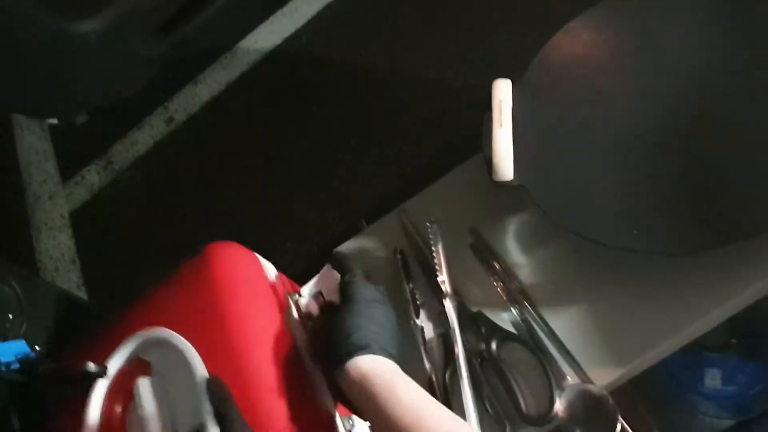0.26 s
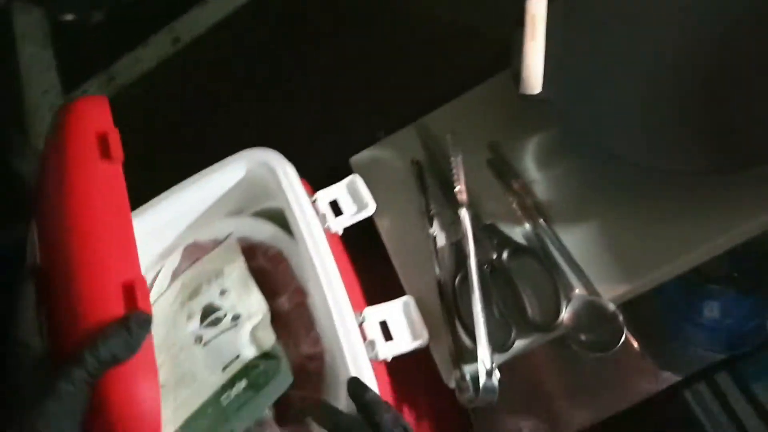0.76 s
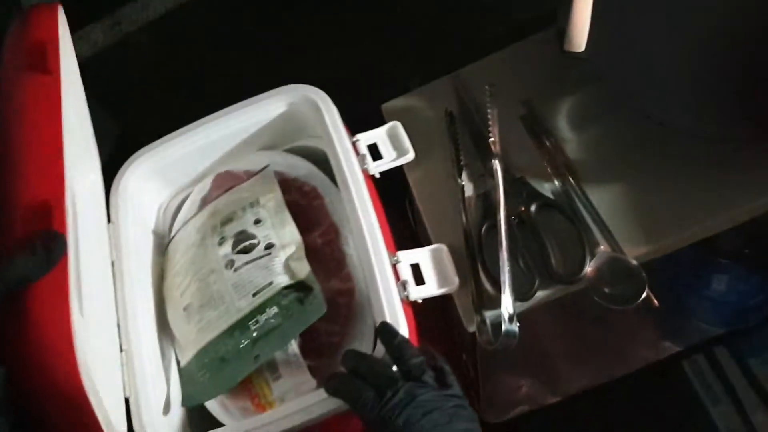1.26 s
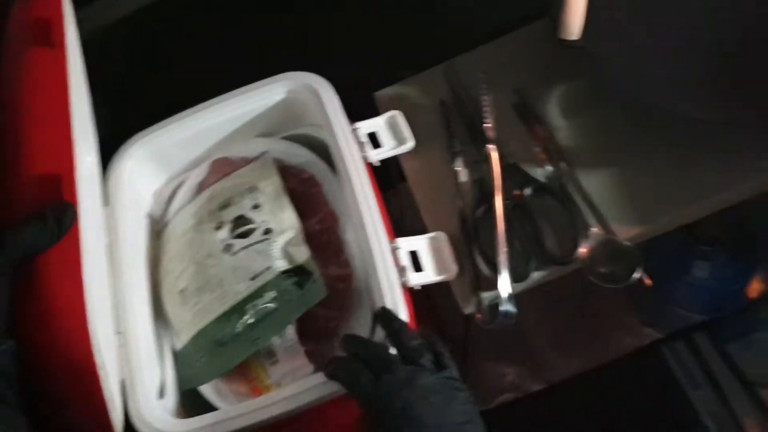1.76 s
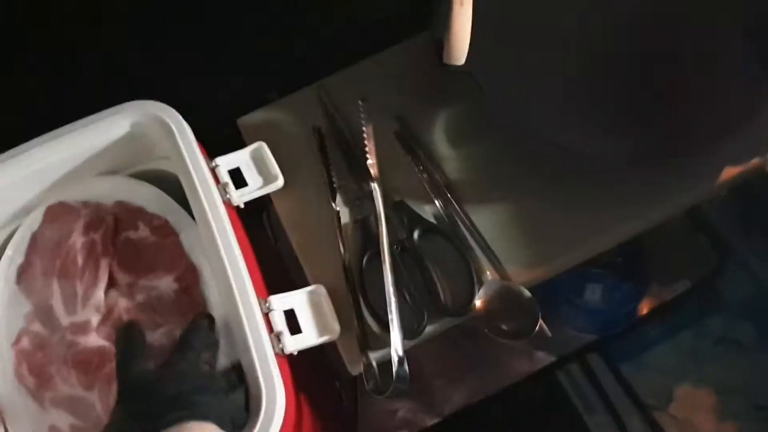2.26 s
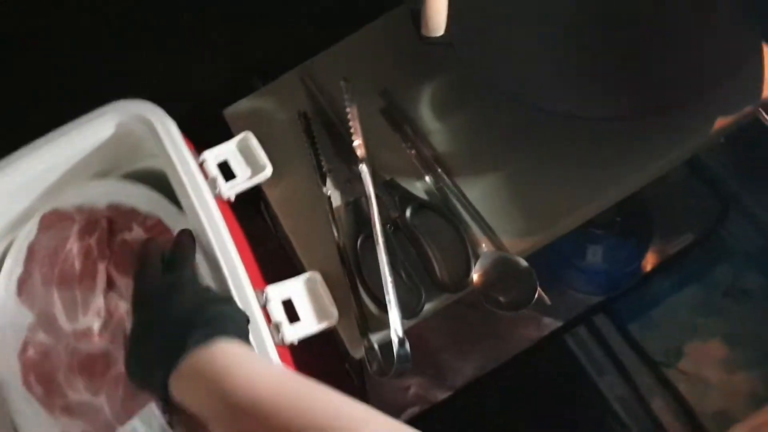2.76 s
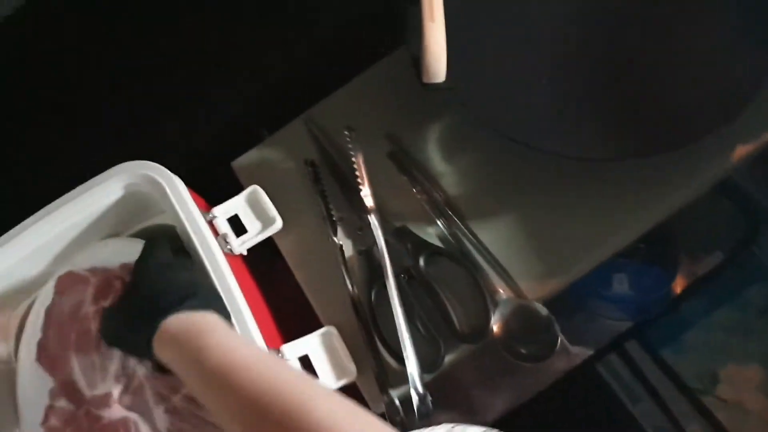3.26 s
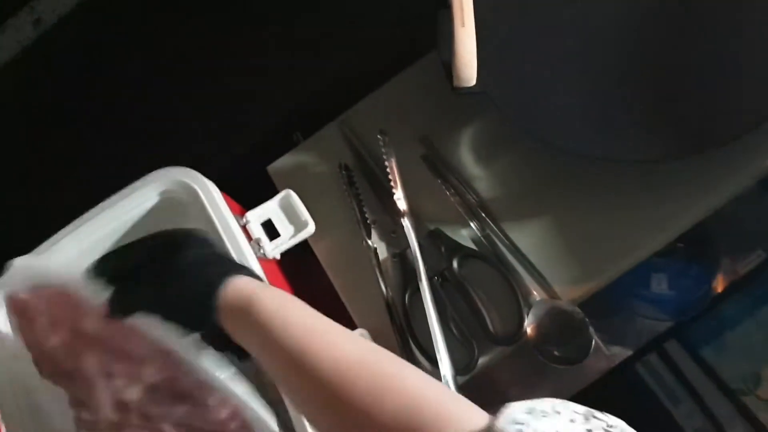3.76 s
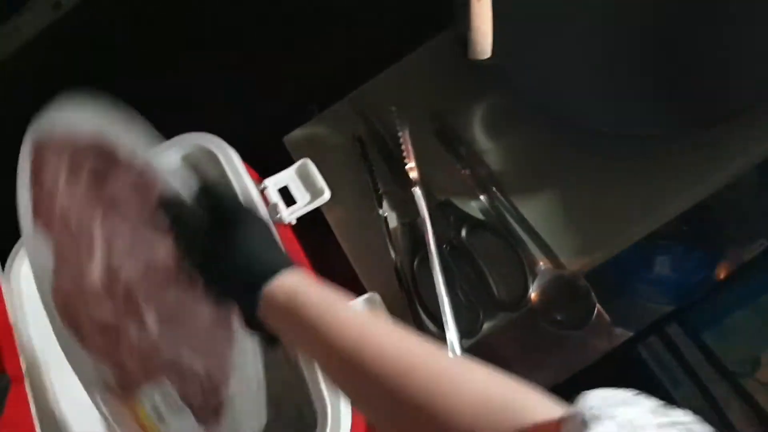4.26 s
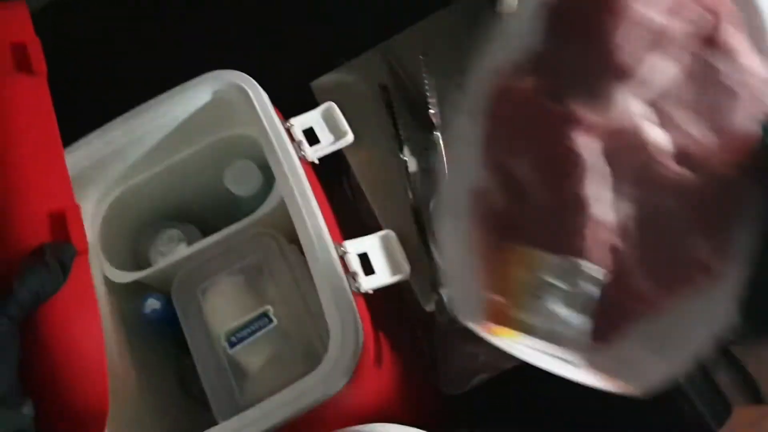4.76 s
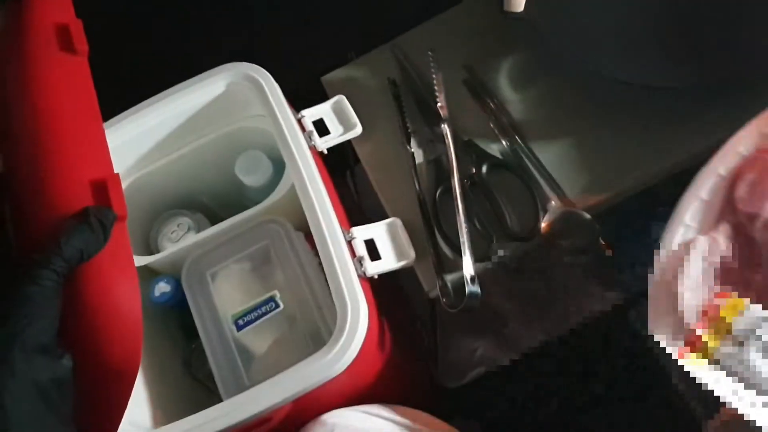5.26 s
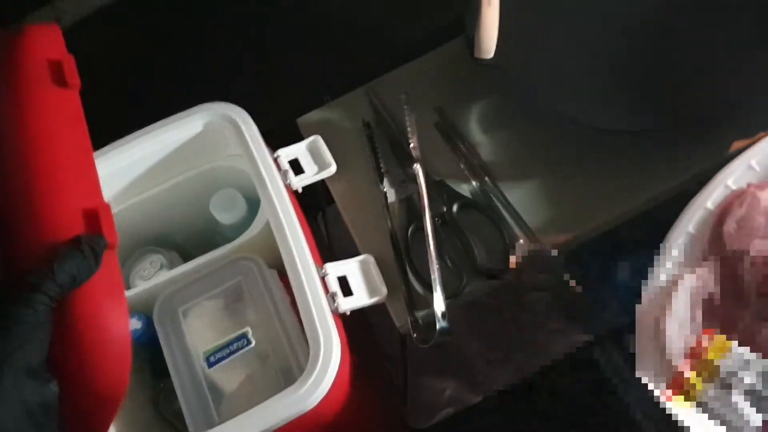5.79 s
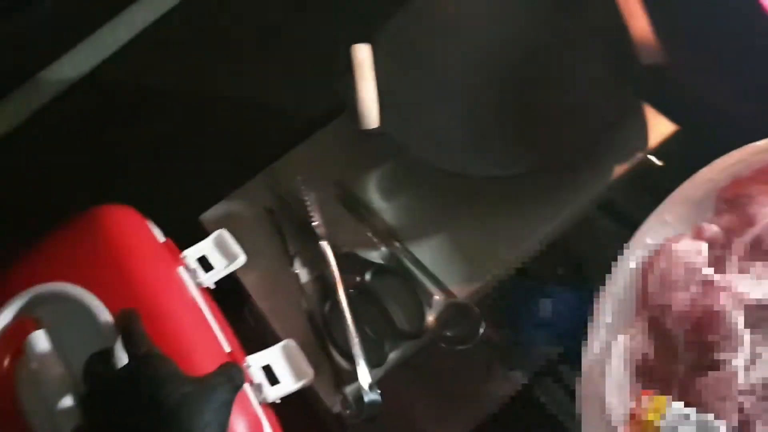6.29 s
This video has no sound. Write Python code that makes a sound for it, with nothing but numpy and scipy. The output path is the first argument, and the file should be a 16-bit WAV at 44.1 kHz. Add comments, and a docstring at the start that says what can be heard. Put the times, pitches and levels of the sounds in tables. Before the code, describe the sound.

Close plastic clicks and hollow knocks, squawks of a wrapped tray dragged from a cool box, and a loud closing thump over faint engine rumble.

```python
"""Outdoors, beside a table with utensils, a plastic cool box is unlatched and swung open close by.
Its latch clicks, its hinge groans and its hollow body booms. A gloved hand grips a film-wrapped tray of
meat and drags it out; the rim sticks and slips along the wall, and quick slips blend into squawks.
The lid falls shut with a thump that rattles the loose parts. A far engine and open air lie underneath."""
import sys
import numpy as np
from scipy import signal
from scipy.fft import rfft, irfft, next_fast_len
from scipy.io import wavfile
from scipy.ndimage import map_coordinates

SR = 44100
rng = np.random.default_rng(int(sys.argv[2]) if len(sys.argv) > 2 else 0)


def output_pcm(signal):
    """Save a mono or channel-first signal as 16-bit PCM at the path in sys.argv[1].

    Samples are clipped to [-1, 1] before scaling.
    """
    pcm = np.clip(np.atleast_2d(signal).T, -1, 1) * 32767
    wavfile.write(sys.argv[1], SR, np.round(pcm).astype(np.int16))


N = 287973
TIME = np.arange(N) / SR
HIT_TIME = np.arange(SR // 3) / SR  # seconds through one hit
SIDES = np.array([[1], [-1]]) / 2  # half of a left-right difference goes to each channel


def amp(db):
    """Turn decibels into a gain to multiply by."""
    return 10 ** (np.asarray(db) / 20)


def unit(x):
    """Scale a sound to an average strength (rms) of 1."""
    return x / np.sqrt(np.mean(x ** 2) + 1e-20)


def burst(x):
    """Give a hit the energy of 10 ms of sound at strength 1."""
    return unit(x) * np.sqrt(.01 * SR / x.shape[-1])


def along(points, hz):
    """Read between (pitch, value) points, with octaves evenly spaced."""
    pitches, values = np.transpose(points)
    return np.interp(np.log(hz + 1), np.log(pitches + 1), values)


def centred(shape, hz):
    """Move a tone shape to the given pitch."""
    return [(multiple * hz, db) for multiple, db in shape]


def wobble(per_s):
    """A smooth curve through per_s random values each second."""
    return map_coordinates(rng.standard_normal(200), [TIME * per_s], mode="wrap")


def strokes(rows, rise_s, fall_s):
    """Movements fade in, hold from start to end and fade out: one gain curve per level column."""
    start, end, *levels = np.transpose(rows)[:, :, None]
    shape = np.clip(np.minimum((TIME - start) / rise_s, (end - TIME) / fall_s) + 1, 0, 1)
    return [np.max(amp(db) * shape, axis=0) for db in levels]


def filtered(x, response):
    """Change each frequency in a sound by response(hz)."""
    size = x.shape[-1]
    padded = next_fast_len(size + 4096)
    hz = np.fft.rfftfreq(padded, 1 / SR)
    return irfft(rfft(x, padded) * response(hz), padded)[..., :size]


def high_pass(x, hz):
    """Turn down the bass below hz."""
    return signal.sosfilt(signal.butter(4, hz, "high", fs=SR, output="sos"), x)


def add(track, start_s, sound):
    """Mix a sound into the track at start_s."""
    start = round(start_s * SR)
    part = track[:, start:start + sound.shape[-1]]
    part += sound[..., :part.shape[-1]]


# How alike left and right sound: pitch_hz, likeness (1 is the same)
LIKENESS = [(50, 0.99), (250, 0.97), (700, 0.19), (2000, 0.05), (6000, 0.013)]
def noise(tone, size=N):
    """Stereo noise, alike on both sides in the bass and unrelated in the treble."""
    def response(hz):
        spread = np.arccos(np.clip(along(LIKENESS, hz), -1, 1)) / 2
        return amp(along(tone, hz)) * [np.cos(spread), np.sin(spread)]
    mid, side = filtered(rng.standard_normal((2, size)), response)
    return unit(np.array([mid + side, mid - side]))


def ring(notes, vary_db, attack_s, swell=False):
    """A struck object rings at its own notes, a new mix each time; wider notes die sooner."""
    hz, width, db = np.transpose(notes)[:, :, None]
    strength = width * amp(db + vary_db * rng.standard_normal(hz.shape))
    sign = (-1) ** (swell * np.arange(len(hz))[:, None])  # opposed notes cancel at first, then swell
    # higher notes reach left and right more out of step
    phase = rng.standard_normal((2, *hz.shape)) * np.minimum(0.24 + hz / 6000, 2)
    decay = np.exp(-np.pi * width * HIT_TIME)
    waves = sign * strength * decay * np.sin(2 * np.pi * hz * HIT_TIME + phase)
    return burst(waves.sum(1) * (1 - np.exp(-HIT_TIME / attack_s)))


# How long echoes in the box take to fall by 60 dB when linger is 1: pitch_hz, fade_s
BOX_ECHO = [(200, 0.094), (1500, 0.059), (5000, 0.062), (14000, 0.063)]
def crack(tone, echo_db, linger=1.0, uneven_db=3):
    """One sharp pulse, then its echoes bouncing between the walls of the box."""
    size = len(HIT_TIME)
    gains = amp(along(tone, np.fft.rfftfreq(2 * size, 1 / SR)))
    # pack the tone into a pulse that comes as early as it can (minimum phase)
    cepstrum = irfft(np.log(gains))[:size]
    pulse = irfft(np.exp(rfft(2 * cepstrum * np.sign(HIT_TIME), 2 * size)))[:size]
    hz, age, bands = signal.stft(noise(tone, size), SR, nperseg=256)
    colour_db = uneven_db * rng.standard_normal((len(hz), 1))
    fade_db = 60 * age / (linger * along(BOX_ECHO, hz)[:, None])
    echoes = signal.istft(bands * amp(colour_db - fade_db), nperseg=256)[1]
    return burst(burst(pulse) + amp(echo_db) * burst(echoes[:, :size]))


def grains(per_s, spread):
    """Tiny clicks of uneven size at random moments."""
    hits = rng.random(N) < per_s / SR
    sizes = np.exp(np.clip(spread * rng.standard_normal(N), -3, 3))
    return unit(hits * sizes * rng.standard_normal((2, N)))


def scrape(notes, per_s):
    """A stream of tiny hits keeps an object ringing."""
    hits = grains(per_s, spread=0.19)
    ringing = ring(notes, vary_db=8.5, attack_s=.0002)
    return unit(signal.fftconvolve(hits, ringing, axes=1)[:, :N])


# The tones of a deep rumble, a low murmur and the open air: pitch_hz, level_db
RUMBLE_TONE = [(20, -28.5), (32, -15.5), (45, -4.5), (60, 7.5), (72, 2.5), (92, -1), (145, -14),
               (225, -8.5), (330, -25.5), (600, -31), (900, -62)]
MURMUR_TONE = [(60, -18), (115, 1), (170, -0.5), (280, -6.5), (450, -18), (900, -28), (2000, -61.5)]
AIR_TONE = [(150, -24), (260, -7.5), (476, -10.5), (680, -10), (1000, -17.5), (2130, -22), (4050, -30.5),
            (7400, -34.5), (10000, -39), (12300, -38.5), (14500, -35.5), (15000, -63.5)]
# The background sinks once the tray is out, then partly returns: time_s, level_db
BACKGROUND_LEVEL = [
    [(0.0, -60.5), (0.55, -58.5), (2.78, -60.5), (3.3, -57)],
    [(4.3, -65), (4.842, -68), (5.548, -68), (6.25, -63.5)],
]
def engine_and_air():
    """A far engine rumbles and drones, and the open air hisses."""
    times, levels = np.vstack(BACKGROUND_LEVEL).T
    level_db = np.interp(TIME, times, levels)
    rumble = amp(-48.5 + 0.59 * wobble(6.5)) * noise(RUMBLE_TONE)
    drone = amp(-52.5 + 1.9 * wobble(14.0)) * noise(MURMUR_TONE)
    air = amp(level_db + 9 + 1.1 * wobble(7.7)) * noise(AIR_TONE)
    drift_db = 0.67 * (level_db - level_db.mean())  # the engine rises and sinks less than the air
    return (rumble + drone) * amp(drift_db + SIDES * 1.8) + air * amp(SIDES * 2.5)


# The notes of the box's wall and of its hollow inside: pitch_hz, width_hz, level_db
WALL_NOTES = [(407, 60, 1), (474, 36, 0.5), (546, 94, 2.5), (708, 48, -2), (800, 160, -8),
              (1140, 250, -16.5)]
HOLLOW_NOTES = [(174.4, 90, -9), (238.3, 37, 3), (290, 40, -1.5)]
# The tone of a plastic click: pitch_hz, level_db
CLICK_TONE = [(300, -25.5), (900, 2), (1400, -4.5), (2100, -4), (3000, -4.5), (4300, -9), (6000, -17),
              (8000, -15.5), (12000, -26.5), (16000, -31)]
# Latch, hinge and lid knock on the box: start_s, thud_db, wall_db, click_db
KNOCK_HITS = [(0.156, -42, -39, -52.5), (0.283, -48, -51, -52), (0.412, -25.5, -41, -32.5),
              (0.487, -30.5, -38, -39.5), (0.576, -35, -27.5, -37.5), (0.652, -58, -64, -43.5),
              (0.717, -28.5, -36.5, -47), (1.102, -50, -53, -48), (1.115, -30, -40.5, -57),
              (1.231, -25.5, -35, -46.5), (1.274, -36, -30.5, -44), (1.307, -31.5, -37.5, -53),
              (1.368, -28.5, -43, -51.5), (1.405, -29, -28, -56), (1.451, -23, -24, -36.5),
              (1.465, -45, -28.5, -37.5), (1.78, -34.5, -46.5, -59), (3.804, -25, -44, -41.5),
              (4.400, -38.5, -39, -57), (6.293, -25.5, -22.5, -48.5), (6.3213, -32, -29.5, -28.5)]
def knocks():
    """A part touches, then settles into place; both clicks ring the wall, and the hollow thuds."""
    out = np.zeros((2, N))
    settle_s = .0045
    for start, thud_db, wall_db, click_db in KNOCK_HITS:
        for delay, wall_change_db, click_change_db in [(0, 0, 0), (settle_s, 0.5, -8.5)]:
            wall = amp(wall_db + wall_change_db - 4) * ring(WALL_NOTES, vary_db=6, attack_s=.0011)
            click = amp(click_db + click_change_db) * crack(CLICK_TONE, echo_db=12.5, uneven_db=-0.5)
            add(out, start + delay, wall + click)
        thud = ring(HOLLOW_NOTES, vary_db=-1, attack_s=.0013, swell=True)
        add(out, start + settle_s / 2, amp(thud_db - 4) * thud)
    return out


# The hands shift the box and its load: start_s, end_s, murmur_db, rumble_db
BOX_SHIFTS = [(0.45, 1.1, -48, -52.5), (1.2, 1.52, -41, -40.5), (1.65, 2.2, -50.5, -45),
              (2.97, 3.3, -46.5, -38.5), (3.45, 3.9, -42.5, -50.5), (3.95, 4.2, -52.5, -47),
              (5.76, 5.86, -78.5, -51)]
def handling():
    """The box murmurs and rumbles whenever the hands shift it."""
    murmur, rumble = strokes(BOX_SHIFTS, rise_s=0.15, fall_s=0.14)
    return amp(1.2 * wobble(5.6)) * (murmur * noise(MURMUR_TONE) + rumble * noise(RUMBLE_TONE))


# The notes of the hinge: pitch_hz, width_hz, level_db
HINGE_NOTES = [(970, 220, 5), (2220, 1800, -15), (4020, 830, -3), (7600, 700, -23.5), (10400, 180, -8)]
# The hinge rubs as the lid swings: start_s, end_s, level_db
HINGE_RUBS = [(.69, .73, -54), (.89, 1.0, -53)]
# Its short groans: start_s, length_s, pitch_hz, level_db
HINGE_GROANS = [(0.671, 0.032, 455, -40), (0.702, 0.015, 465, -37.5), (.755, 0.037, 452, -49)]
def hinge():
    """The plastic hinge groans as it starts to turn, then rubs quietly."""
    swing, = strokes(HINGE_RUBS, rise_s=0.028, fall_s=0.071)
    out = swing * scrape(HINGE_NOTES, per_s=1500)
    for start, length, hz, db in HINGE_GROANS:
        swell = np.sin(np.pi * np.minimum(HIT_TIME / length, 1))
        add(out, start, amp(db + 5.5) * swell * np.sin(2 * np.pi * hz * HIT_TIME))
    return out


# The low notes of the whole box: pitch_hz, width_hz, level_db
BOX_NOTES = [(88, 35, -2.5), (130, 45, 2.5), (192, 160, -2), (270, 100, -5.5)]
# The tray and the hand bump the box: start_s, level_db, left_louder_db
BUMP_HITS = [(0.731, -25, 0), (1.148, -26.5, -1), (1.464, -16.5, 3), (1.499, -22, 1), (3.032, -22.5, 6.5),
             (3.064, -27.5, 28), (3.076, -14, 14), (3.384, -31, 6), (3.426, -22.5, 1), (3.542, -14, -1.5)]
def bumps():
    """A soft bump makes the box boom without a click."""
    out = np.zeros((2, N))
    for start, db, left_db in BUMP_HITS:
        boom = ring(BOX_NOTES, vary_db=1.5, attack_s=.00165, swell=True)
        add(out, start, amp(db - 9 + SIDES * left_db) * boom)
    return out


# The tone of a crackle: pitch_hz, level_db
CRACKLE_TONE = [(300, 3), (1000, 1.5), (2800, 2.5), (6000, -11), (11000, -9), (15000, -17)]
# The tone of a sharp tick: pitch_multiple, level_db
TICK_SHAPE = [(.2, -32), (.62, -12), (.82, -8.5), (1, -1.5), (1.18, -11), (1.4, -24.5)]
# Wrap and plastic tick: start_s, crackle_db, tick_db, pitch_hz, left_louder_db
WRAP_TICKS = [(1.232, -54, -47.5, 7700, 11), (2.4085, -34, -41, 9800, 8), (2.4207, -59, -36.5, 9950, 9),
              (2.5459, -43, -44.5, 8100, 3), (3.337, -44.5, -42, 12500, 8), (3.36, -48, -40, 12800, 4),
              (3.4007, -23.5, -17.5, 11300, 0.5), (3.9517, -46, -39.5, 12360, -4),
              (4.1185, -63, -45, 10200, 2), (4.1939, -31, -34.5, 11000, -3)]
def wrap_ticks():
    """The stretched wrap and the plastic tick under the glove."""
    out = np.zeros((2, N))
    for start, crackle_db, tick_db, hz, left_db in WRAP_TICKS:
        add(out, start, amp(crackle_db - 4.5) * crack(CRACKLE_TONE, echo_db=9.5))
        tick = crack(centred(TICK_SHAPE, hz), echo_db=4.5, linger=0.96)
        add(out, start, amp(tick_db - 6.5 + SIDES * left_db) * tick)
    return out


# The tone of a glove on plastic: pitch_hz, level_db
BRUSH_TONE = [(1500, 0), (4000, -10), (7500, 4), (11000, -2), (14500, -13), (15500, -33)]
# The glove brushes over a bag and the wrap: start_s, end_s, level_db
GLOVE_STROKES = [(1.58, 1.85, -68), (1.97, 2.55, -67), (2.82, 3.05, -64), (3.19, 3.25, -57.5),
                 (5.8, 5.9, -71)]
def glove():
    """A thin glove slides over plastic with a soft, uneven hiss."""
    brush, = strokes(GLOVE_STROKES, rise_s=0.1, fall_s=0.066)
    return brush * amp(2 * wobble(25)) * noise(BRUSH_TONE)


# The notes of the tray: pitch_hz, width_hz, level_db
TRAY_NOTES = [(248, 52, -10.5), (463, 27, -2), (557, 44, -6.5), (720, 25, -8), (792, 69, -1.5),
              (829, 110, 1.5), (920, 36, -6.5), (960, 18, -11.5), (958, 35, -7.5)]
# The tone of rustling wrap: pitch_hz, level_db
RUSTLE_TONE = [(290, -34), (500, -3.5), (773, -4), (1000, -8), (1190, -12), (1640, -8), (2650, -10),
               (4400, -13), (12700, -10), (16000, -18.5)]
# The tray slides: start_s, end_s, rub_db, rustle_db
TRAY_SLIDES = [(3.365, 3.45, -48.5, -48.5), (3.49, 3.65, -32.5, -60.5), (3.78, 3.85, -45, -48),
               (3.9, 4.23, -48, -62)]
def tray_sliding():
    """The tray rubs finely along the wall and its wrap rustles."""
    rub, rustle = strokes(TRAY_SLIDES, rise_s=0.059, fall_s=0.079)
    grit = unit(filtered(grains(per_s=1000, spread=0.6), lambda hz: amp(along(CLICK_TONE, hz))))
    crinkle = unit(filtered(grains(per_s=1600, spread=0.35), lambda hz: amp(along(RUSTLE_TONE, hz))))
    rubbing = 0.46 * scrape(TRAY_NOTES, per_s=1500) + .4 * grit
    rustling = 0.97 * crinkle + 1.5 * noise(RUSTLE_TONE)
    return rub * rubbing + rustle * rustling


# The notes of the tight wrap: pitch_hz, width_hz, level_db
WRAP_NOTES = [(1694, 62, -0.5), (1680, 24, -7), (1890, 56, 3.5), (2018, 36, -0.5), (2260, 51, 1.5),
              (2506, 47, -7), (2883, 24, 6), (3210, 70, -1.5), (3670, 25, -2), (3724, 70, -5.5),
              (3990, 35, -3.5), (4104, 60, -10), (4370, 70, -10), (5030, 60, -9), (5330, 61, -4),
              (6300, 60, -9.5), (7790, 260, -12.5)]
# The tone of the rim letting go: pitch_hz, level_db
SNAP_TONE = [(200, -19.5), (700, -5), (1000, 2), (1350, -4), (1900, -2), (3200, -0.5), (4800, -8),
             (6500, -6.5), (9000, -13.5), (12000, -11.5), (16000, -17)]
def slip(ring_db, snap_db):
    """The tray's rim lets go with a snap; the tray and its tight wrap ring."""
    body = amp(ring_db - 0.86) * ring(TRAY_NOTES, vary_db=3, attack_s=.0002)
    wrap = amp(snap_db - 4) * ring(WRAP_NOTES, vary_db=1.5, attack_s=.00036)
    snap = amp(snap_db - 3) * crack(SNAP_TONE, echo_db=11.5, linger=0.89, uneven_db=-3.5)
    return high_pass(body, hz=170) + wrap + snap


# Pulls on the tray: start_s, length_s, slip_count, speed_up (below 0 slows down),
# ring_db, ring_growth_db, snap_db, snap_growth_db
TRAY_PULLS = [(3.381, 0, 1, 0, -48.5, 0, -31, 2), (3.425, .018, 3, 0, -37, 4, -31, -4.5),
              (3.474, .059, 4, -.25, -36.5, 3.5, -37, 0), (3.562, .092, 6, .1, -26.5, 11.5, -23, 3.5),
              (3.66, .035, 9, .3, -22.5, -0.5, -21.5, 2), (3.74, .017, 5, 0, -23.5, -8, -20, -6),
              (3.769, 0, 1, 0, -33, 0, -23.5, 0), (3.851, .025, 2, 0, -28.5, -4.5, -34, 1.5),
              (3.985, .024, 3, 0, -33.5, 9.5, -33, 1)]
def tray_squawks():
    """With each pull the rim sticks and slips along the wall; fast slips blend into a squawk."""
    out = np.zeros((2, N))
    delay_s = 0.0007  # each slip sounds just after its listed time
    for start, length, count, speed_up, ring_db, ring_growth_db, snap_db, snap_growth_db in TRAY_PULLS:
        steps = np.linspace(0, 1, round(count))
        for progress, (jitter, size) in zip(steps, rng.standard_normal((12, 2))):
            place = progress + progress * (1 - progress) * speed_up
            place += (0 < progress < 1) * .05 * jitter / count  # first and last slips stay on time
            sound = slip(ring_db + progress * ring_growth_db, snap_db + progress * snap_growth_db)
            add(out, start + place * length + delay_s, amp(2.3 * size) * sound)
    return out


# The notes of the box's rim: pitch_hz, width_hz, level_db
RIM_NOTES = [(257, 54, 5), (337, 68, -5)]
# The tone of a clack: pitch_multiple, level_db
CLACK_SHAPE = [(.15, -7), (.42, -10.5), (.62, -13), (.85, -3.5), (1.1, -0.5), (1.5, -9), (2.5, -23),
               (4.5, -25.5), (8, -28)]
# Hits on the box's rim: start_s, thud_db, clack_db, pitch_hz
RIM_HITS = [(4.222, -24.5, -25.5, 1990), (6.2872, -16, -31, 1470)]
def rim_clacks():
    """The box's rim thuds and clacks as the tray springs free, and again as the lid meets it."""
    out = np.zeros((2, N))
    for start, thud_db, clack_db, hz in RIM_HITS:
        thud = ring(RIM_NOTES, vary_db=1, attack_s=.0005, swell=True)
        clack = crack(centred(CLACK_SHAPE, hz), echo_db=9, linger=0.78, uneven_db=-3)
        add(out, start, amp(thud_db) * thud + amp(clack_db) * clack)
    return out


# The notes of the closed box and of the loose parts: pitch_hz, width_hz, level_db
SLAM_NOTES = [(55, 8, 5.5), (116.3, 42, 1.5), (173, 18.6, 4.5), (237, 82, -3.5), (303, 24, -1.5),
              (472, 26, -19)]
LOOSE_NOTES = [(695, 28, -4), (910, 33, 9), (1214, 28, 3), (1410, 30, -6), (1543, 78, 8), (2100, 46, -7.5),
               (2790, 42, -16)]
# The tone of the shuddering box: pitch_hz, level_db
SHUDDER_TONE = [(30, -26), (55, 18), (80, -19), (125, 7.5), (200, -18), (400, -12.5), (900, -43)]
# The lid lands: start_s, level_db
LID_LANDING = [(6.2867, -6)]
def lid_slam():
    """The lid booms on the closed box; the box shudders and sets latches and utensils rattling."""
    out = np.zeros((2, N))
    (start, db), = LID_LANDING
    add(out, start, amp(db - .5) * ring(SLAM_NOTES, vary_db=.7, attack_s=.0008, swell=True))
    rise_s, shake_s = 0.02, 0.13
    sag_db_per_s, stop_db_per_s, fizz_db_per_s = 71, 395, 37  # these fades add up
    age = np.maximum(TIME - start, 0)
    fade_db = sag_db_per_s * age + stop_db_per_s * np.maximum(age - shake_s, 0)
    shake = np.minimum(age / rise_s, 1) * amp(-31 - fade_db)
    rattle = amp(-7) * scrape(LOOSE_NOTES, per_s=700)
    fizz = amp(-4 - fizz_db_per_s * age) * noise(CRACKLE_TONE)
    shudder = amp(7) * noise(SHUDDER_TONE)
    return out + shake * (rattle + fizz + shudder)


# The box is mostly louder on the left: pitch_hz, left_louder_db
LEFT_BOOST = [(100, 2.5), (400, 4.5), (750, 1.5), (1300, 10), (2400, 3.5), (5500, -2), (12000, 5.5)]
def from_left(x, lead):
    """The box is nearer the left microphone, so waves get there lead(hz) radians earlier."""
    return filtered(x, lambda hz: amp(SIDES * along(LEFT_BOOST, hz)) * np.exp(1j * SIDES * lead(hz)))


# The tray's sound travels by way of the box walls: pitch_hz, left_lead_radians
THROUGH_WALLS = [(100, .2), (450, .3), (800, 1.53), (1200, 2.5), (1750, 3.8), (2250, 6.1), (2600, 9.2),
                 (4000, 8.1), (5300, 17.5), (9000, 28)]
def scene():
    """Everything that happens at the box, over the engine and the air."""
    left_lead_s = 0.0002806
    outside = knocks() + bumps() + rim_clacks() + handling() + hinge()
    outside = outside + glove() + wrap_ticks() + lid_slam()
    outside = from_left(outside, lambda hz: 2 * np.pi * hz * left_lead_s)
    inside = from_left(tray_squawks() + tray_sliding(), lambda hz: along(THROUGH_WALLS, hz))
    return outside + inside + engine_and_air()


def record(dry):
    """The deepest bass and highest treble are cut, and the loudest peaks are rounded off."""
    ceiling, top_hz = .92, 15900
    lean = high_pass(dry, hz=41)
    rounded = lean / (1 + np.abs(lean / ceiling) ** 6) ** (1 / 6)
    return filtered(rounded, lambda hz: 1 / (1 + (hz / top_hz) ** 120))


dry = scene()
out = record(dry)
output_pcm(out)
```